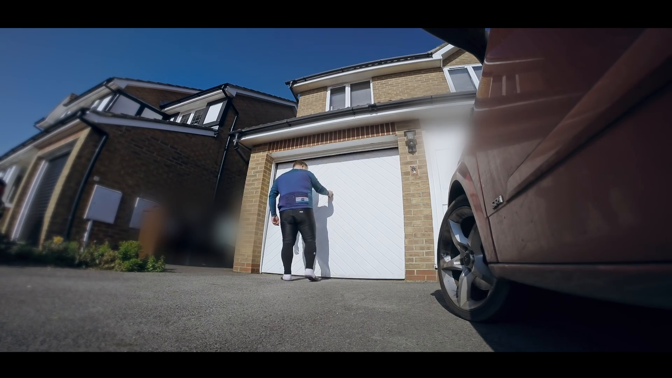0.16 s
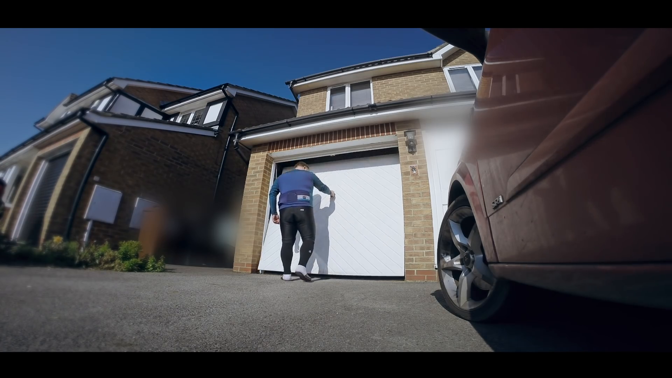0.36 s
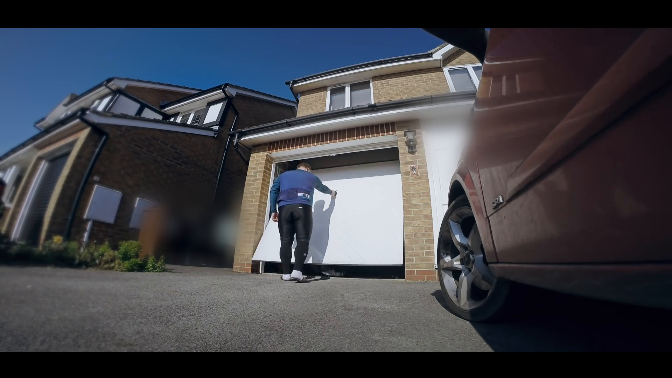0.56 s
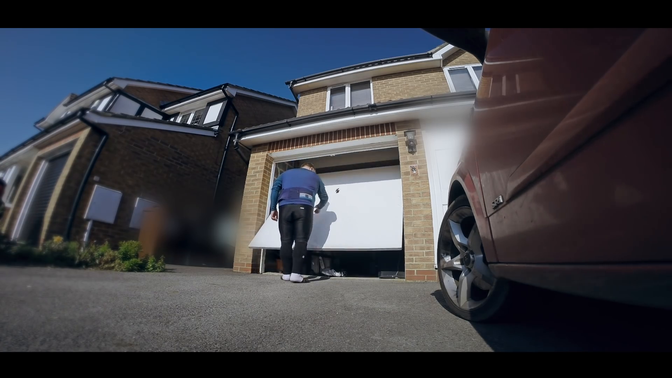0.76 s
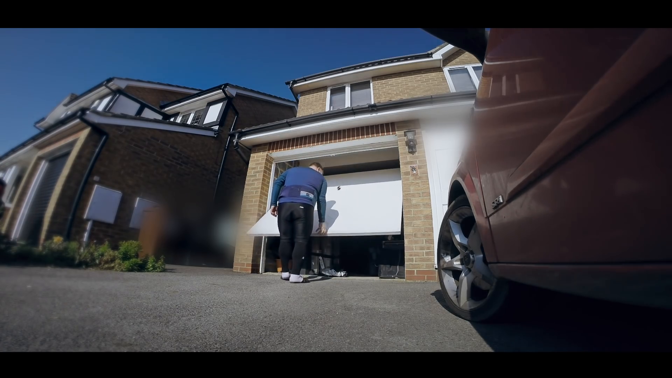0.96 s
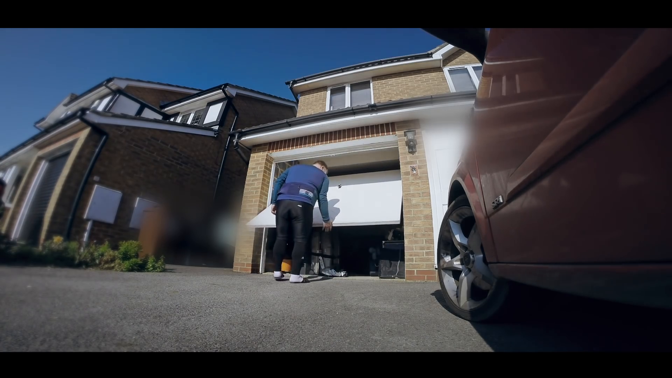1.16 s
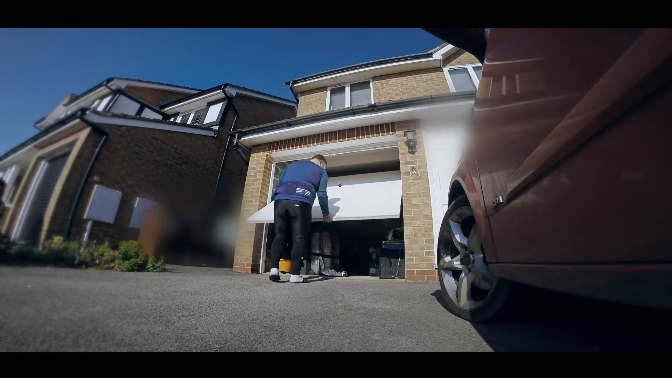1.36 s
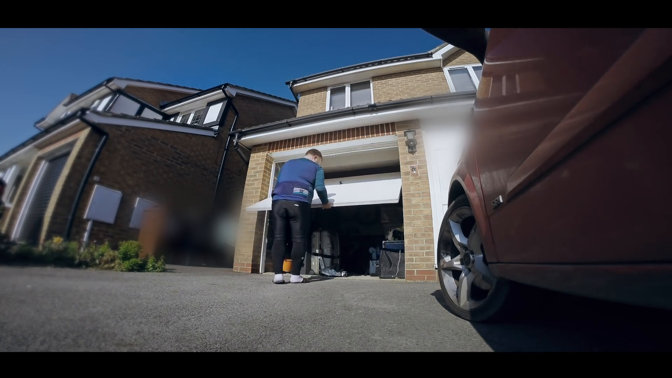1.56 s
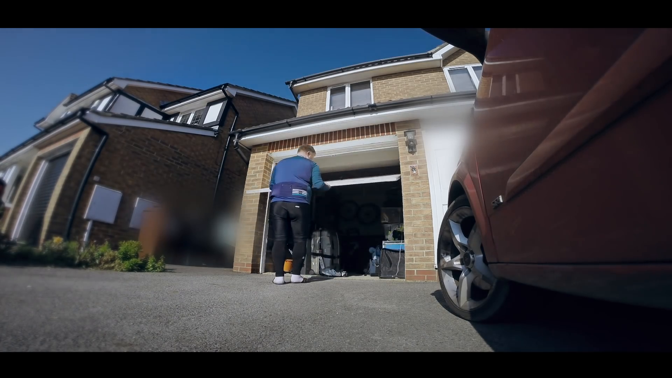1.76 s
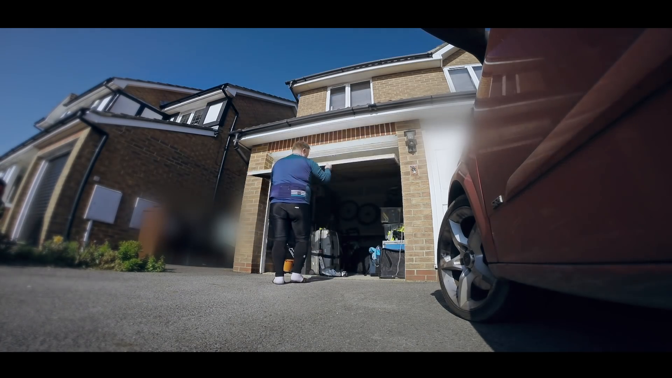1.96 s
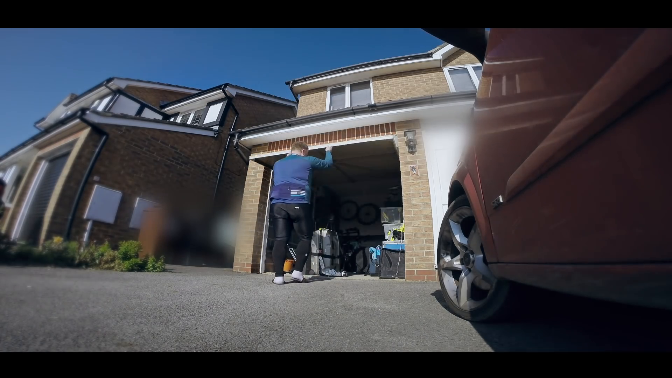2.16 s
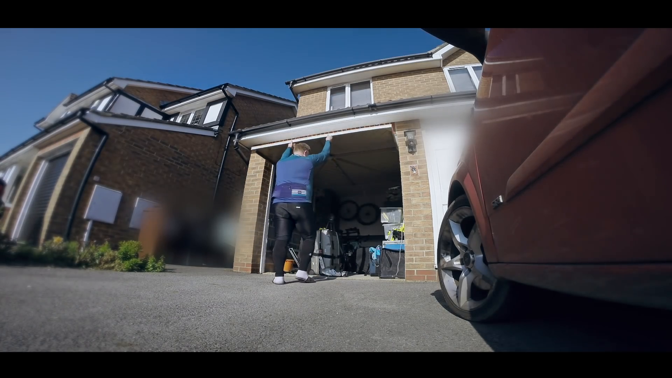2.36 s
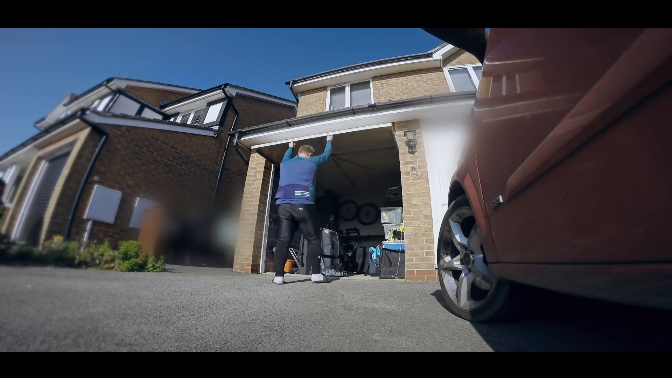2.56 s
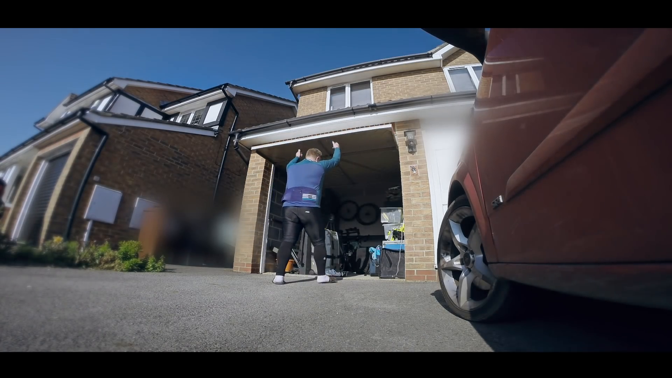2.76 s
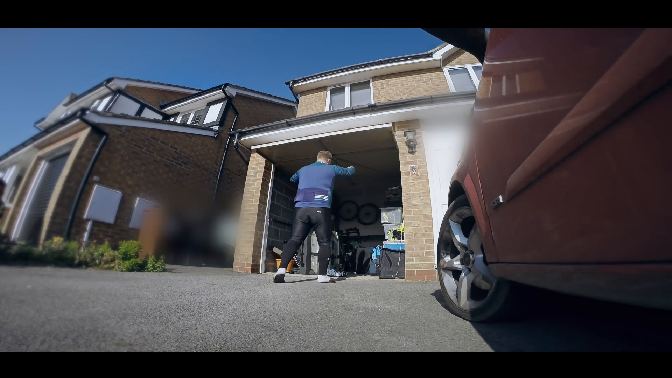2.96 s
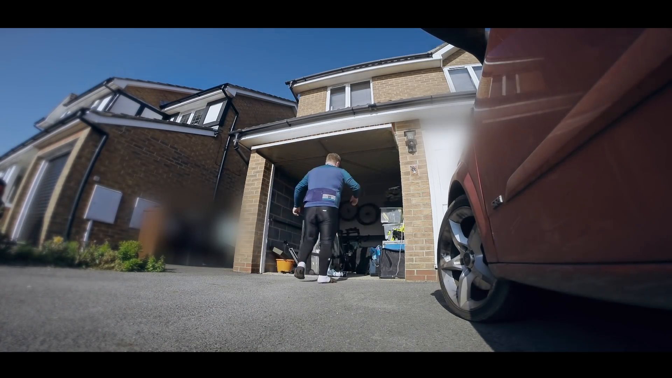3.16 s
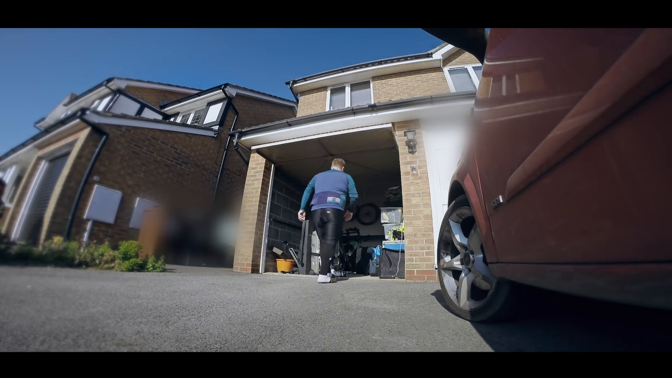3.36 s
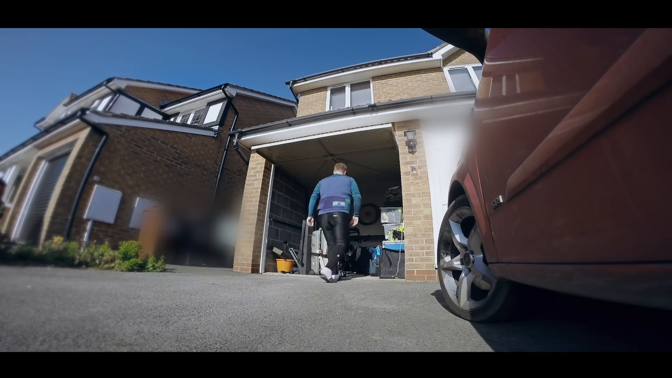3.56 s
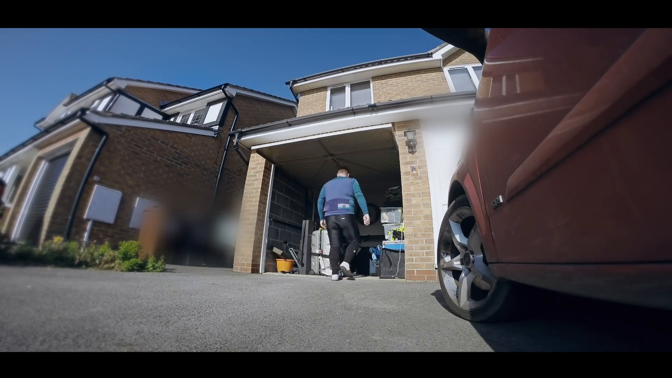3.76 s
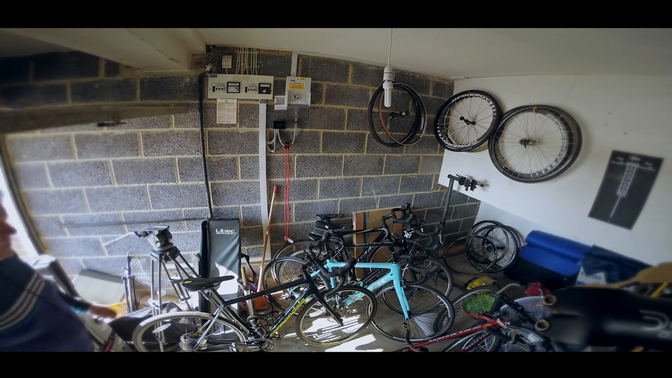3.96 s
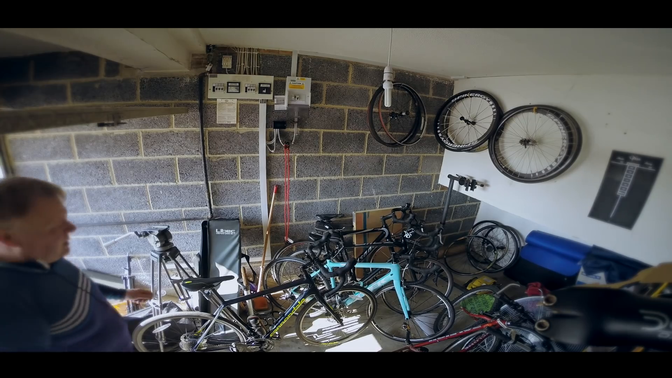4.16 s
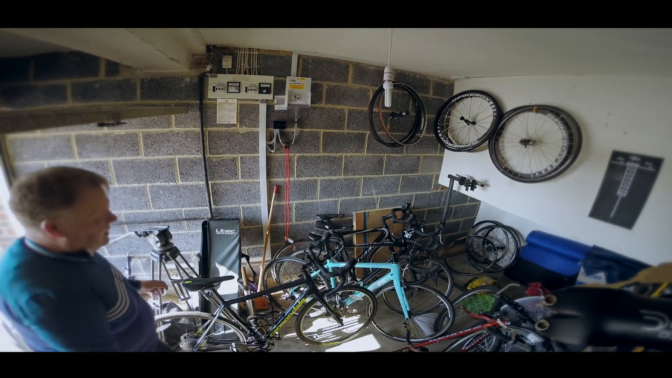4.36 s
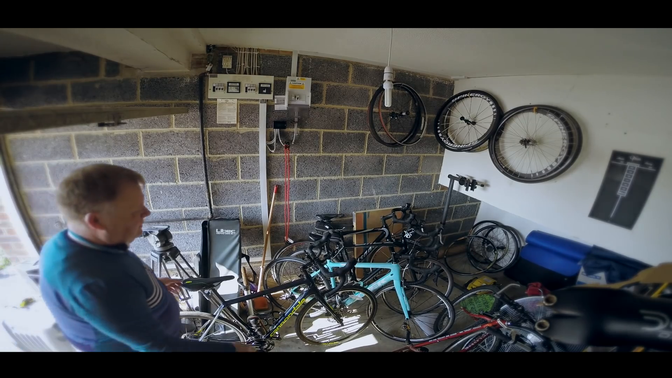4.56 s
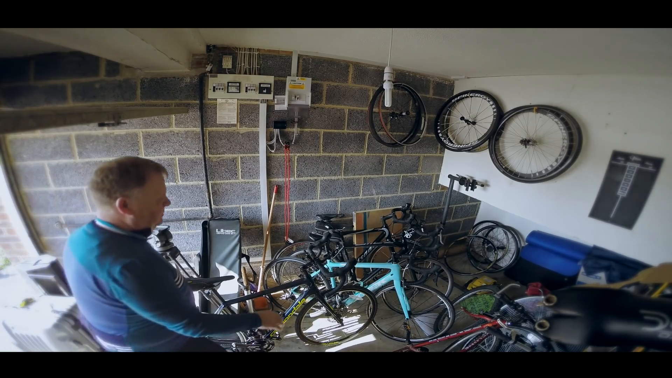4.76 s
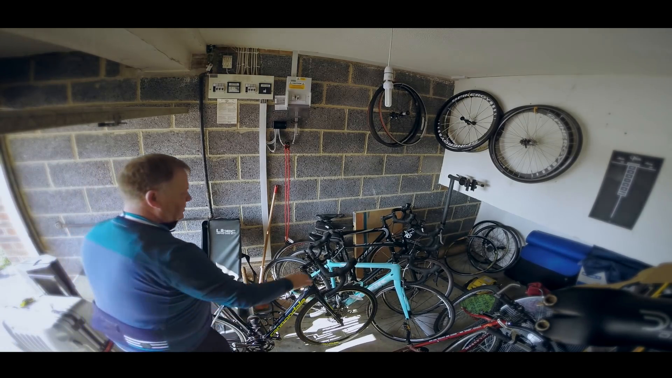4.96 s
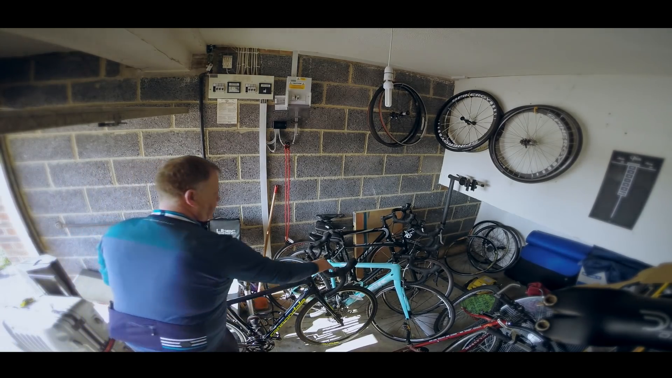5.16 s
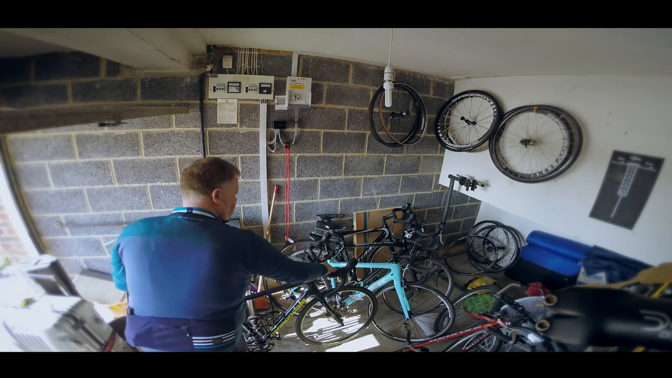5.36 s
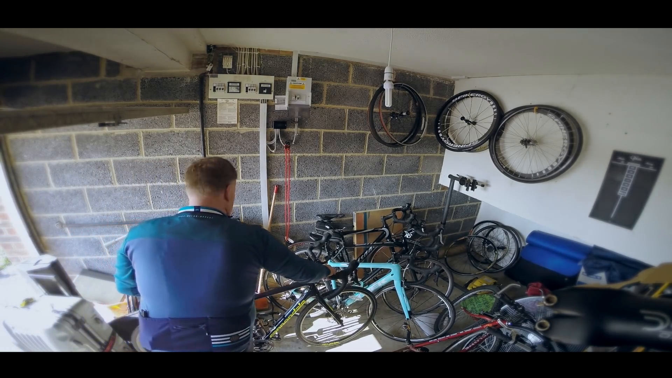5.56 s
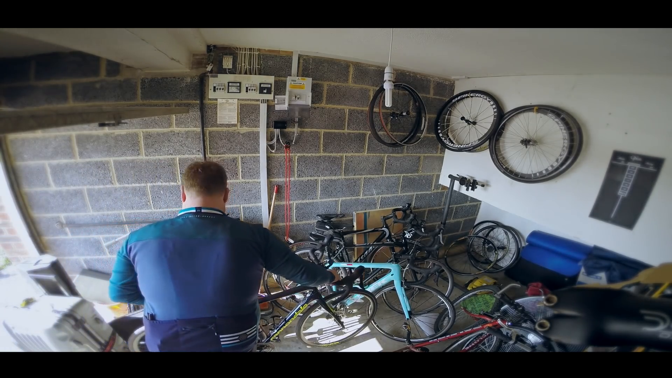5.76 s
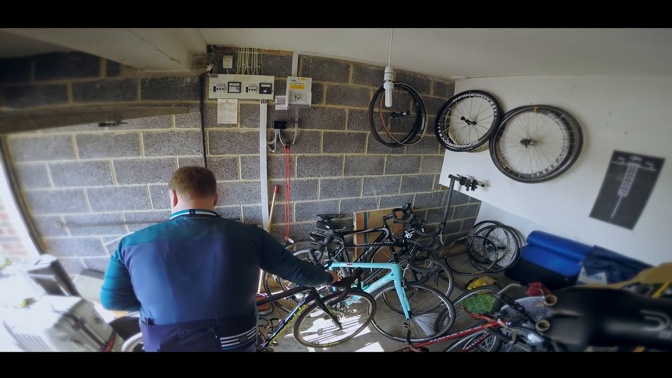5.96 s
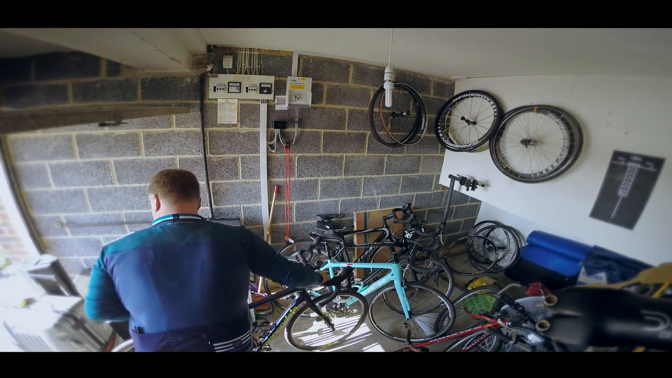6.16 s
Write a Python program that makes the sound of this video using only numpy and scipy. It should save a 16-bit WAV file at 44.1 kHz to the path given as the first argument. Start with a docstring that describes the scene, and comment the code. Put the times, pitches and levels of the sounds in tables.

```python
"""At a garage, a steel up-and-over door is hauled open in two main surges: struck and shaken modes boom and clank,
dense grains through metal spectra rattle like rollers in tracks. Gliding sines chirp as small birds over shaped-noise
rumble, and shoes tap across the drive as short noise bursts.
From 4 s the scene is heard inside the block-walled garage: shoes clack (modes), scuff and clatter (grit grains)."""
import sys
import numpy as np
from scipy import signal
from scipy.fft import rfft, irfft, next_fast_len
from scipy.io import wavfile
from scipy.ndimage import map_coordinates

SR = 44100
rng = np.random.default_rng(int(sys.argv[2]) if len(sys.argv) > 2 else 0)


def dump_mix(stems):
    """Bounce the given channels to the path in sys.argv[1] as a 16-bit WAV at rate SR."""
    frames = np.atleast_2d(stems).T  # one column per channel
    limited = np.clip(frames, -1, 1)  # hard clip at full scale
    pcm = np.round(limited * 32767).astype(np.int16)
    wavfile.write(sys.argv[1], SR, pcm)


N = 274257
TIME = np.arange(N) / SR  # s
INSIDE_S, TOP_HZ = 4.01, 15500
STREET_DB, INDOORS_DB = -50.5, -53.5  # before slow wander
ECHO_GAIN = 0.26  # each early echo against direct
SEAL_DB, SEAL_SHARE = -6, 0.11  # frame damps the sheet over the first share of the travel
CHATTER_DB = -4  # stray joint knocks against frame rattle
ARMS_DB, TICK_DB = -4, -7.5  # arms against frame blow; tick against track click
JOLT_DB, JOLT_OPEN_DB = -7.5, -12  # panel against frame blow when shut; change when fully open

# background spectra: f/Hz, relative level/dB
STREET_SPECTRUM = [(12, -46), (20, -5.5), (76, -3.5), (306, -17.5), (404, -21), (549, -24), (1300, -28),
                   (3260, -33), (3960, -35.5), (4680, -36), (15500, -55.5)]
INDOORS_SPECTRUM = [(12, -59), (20, -9), (53, -5), (245, -17.5), (282, -16.5), (649, -21), (767, -22),
                    (2470, -30), (2920, -32), (3540, -31.5), (3960, -32), (15500, -52)]
# pulls on the door (loosening tug, haul, change of grip, haul, nudge):
# start t/s, rise/s, let-go t/s, slowing/(dB/s), speed/dB
HAULS = [(-.01, 0.01, 0.27, 59, -12.5), (0.514, 0.18, 1.046, 49.5, 0), (1.55, 0.13, 1.73, 65, -14),
         (1.696, 0.085, 2.361, 50.5, 0), (2.66, 0.038, 2.7, 74, -41)]
# response of each part to motion: level/dB at full speed when shut, growth/(dB per dB of speed),
# change/dB from shut to fully open
BOOM_DRIVE = (-44, 0.19, -0.97)
DRUMMING_DRIVE = (-38, 0.58, -3)
SHEET_DRIVE = (-35, 0.86, -14.5)
RATTLE_DRIVE = (-47.5, 0.92, 5)
HISS_DRIVE = (-50.5, 1.01, 2.5)
SIZZLE_DRIVE = (-60.5, 2.5, 14)
# modes of steel panel, roller bearings, frame and lifting arms: f/Hz, width/Hz, relative level/dB
PANEL_MODES = [(48, 14, -8), (66.7, 9.3, 5.5), (108.6, 13, 0), (145, 11.8, 5), (155.7, 25.2, 1),
               (178.3, 18.7, 1), (207.4, 30, -4), (257.7, 27.4, -3.5), (294, 8.1, 0), (302.4, 13, -6),
               (344, 37, -5), (377, 43, -9), (436.5, 24.5, -8.5), (542, 27, -14.5)]
BEARING_MODES = [(5200, 970, -4.5), (5550, 500, 4), (5940, 450, 2), (6230, 490, 0.5), (15100, 5100, -26)]
ARM_MODES = [(659.4, 34, 1.5), (748, 150, 4), (890, 38, 1), (927, 21, -4), (1118, 120, -14),
             (1315, 62, -1.5), (1417, 9.5, -12), (1710, 43, -4.5), (1883, 110, -12), (2017, 290, -2.5),
             (2140, 21, -11.5)]
# sheet flexing as it tips: peak t/s, half-length/s, f/Hz, level/dB
FLEXES = [(0.216, 0.15, 46.3, -38.5), (0.294, 0.035, 119.7, -41), (0.387, 0.03, 66.1, -41),
          (0.59, 0.018, 151.2, -32), (0.703, 0.066, 53, -31), (.78, 0.18, 27.45, -38),
          (0.796, 0.058, 67, -35), (0.807, 0.037, 133.9, -34.5), (0.984, 0.061, 288.2, -33.5),
          (1.786, 0.048, 142.2, -38.5), (1.974, .047, 111.8, -42), (2.136, 0.0097, 290, -38),
          (2.17, 0.19, 51.8, -44), (2.223, 0.025, 110, -29.5), (2.336, 0.14, 77.93, -37.5),
          (2.667, 0.039, 65.3, -36.5)]
# spectra of frame, track, rollers, steel-on-steel contact: f/Hz, relative level/dB
FRAME_SPECTRUM = [(250, -70), (520, -8), (760, 0.5), (970, 0), (1400, -6.5), (2000, -14.5), (2600, -32),
                  (4500, -109)]
TRACK_SPECTRUM = [(1200, -30), (2500, 1), (3600, 3.5), (4800, -0.5), (6000, 3), (7200, -6.5), (10000, -12),
                  (13000, -29), (15500, -18)]
ROLLER_SPECTRUM = [(1200, 2), (2500, 2.5), (3600, 1.5), (4900, -1), (6100, -15), (6900, -10), (9000, -16),
                   (13000, -31), (15500, -48)]
CONTACT_SPECTRUM = [(350, -2.5), (1000, 3.5), (1800, -5.5), (3500, -9.5), (6000, -42)]
# roller skidding in its track: peak t/s, half-length/s, level/dB before load sway
SKIDS = [(1.161, 0.0086, -52), (2.052, 0.015, -38), (2.295, 0.0086, -50), (2.46, 0.027, -46.5),
         (2.561, 0.015, -55)]
# slack joint clicks on the track, then strikes the frame: t/s, slack/s, track level/dB, frame level/dB
CLANKS = [(0.034, 0.0023, -53, -57), (.168, 0.00032, -58.5, -51), (.188, 0, -66, -51),
          (0.532, 0.00031, -56.5, -50.5), (.588, .015, -62, -46.5), (0.7, 0.0011, -54, -36),
          (.711, 0, -56, -38.5), (.753, 0, -42.5, -39.5), (0.772, 0.00076, -46, -34.5),
          (0.827, 0.002, -50, -44.5), (.901, 0.002, -47, -33.5), (.912, 0.0031, -51, -35.5),
          (.954, 0.0052, -50, -38), (0.969, 0, -50.5, -45.5), (1.036, 0, -44, -47.5),
          (1.082, 0.0013, -52, -56), (1.145, 0.0089, -42, -41.5), (1.202, 0, -55, -42.5),
          (1.349, 0.0046, -50, -51), (1.714, 0.023, -45, -39.5), (1.88, 0.01, -42, -55),
          (1.9453, 0.0035, -45, -45.5), (2.023, 0.014, -45, -41), (2.222, 0, -49, -57),
          (2.261, 0.0049, -49.5, -62), (2.374, 0, -62, -62), (2.39, 0.0037, -45, -45),
          (2.421, 0.0035, -49, -37.5), (2.445, 0.00082, -50, -37.5), (2.604, 0.00026, -79, -48.5),
          (2.66, 0.0055, -60.5, -53.5)]
# decay of struck steel: f/Hz, T60/s
STEEL_T60 = [(100, 1), (300, 0.18), (1000, 0.14), (3000, 0.19), (6000, 0.17), (14000, 0.14)]
# small loose metal parts, on the door then in the garage: t/s, f/Hz, level/dB before a 7 dB cut, T60/s
CLINKS = [(.034, 11500, -56, 0.044), (.153, 4120, -53.5, 0.038), (.189, 1880, -45.5, .035),
          (.260, 2940, -47.5, 0.04), (.295, 3000, -49.5, 0.02), (0.702, 2100, -36.5, 0.066),
          (0.712, 1030, -31.5, .11), (.722, 2330, -38, 0.094), (0.904, 3230, -43, 0.14),
          (1.147, 3210, -39, 0.11), (1.353, 3080, -40.5, 0.048), (1.945, 3930, -38, 0.029),
          (2.39, 3900, -40, 0.15), (2.806, 3870, -59, 0.056), (2.853, 3840, -57, 0.034),
          (4.049, 6400, -46, 0.11), (5.365, 3430, -53.5, 0.15), (5.745, 5400, -50, 0.11),
          (5.762, 4360, -51.5, 0.12), (5.8, 4900, -53, .1)]
# small birds: t/s, length/s, start f/Hz, end f/Hz, level/dB before flutter and echo
CHIRPS = [(0.349, 0.13, 7960, 7600, -72), (0.438, 0.081, 7300, 7600, -74), (2.866, 0.017, 5430, 6200, -66),
          (2.888, 0.02, 5200, 6030, -58.5), (3.833, 0.045, 3150, 4240, -53.5),
          (3.939, 0.032, 5200, 5900, -58), (3.941, 0.044, 4000, 4500, -60), (4.464, 0.017, 3070, 2900, -55),
          (4.704, .02, 3140, 2870, -58), (4.902, .022, 2960, 3030, -61), (5.588, 0.019, 3110, 2850, -51.5),
          (6.013, 0.024, 3040, 2890, -55.5)]
# shoes on the drive: t/s, tap level/dB, grit level/dB
DRIVE_STEPS = [(2.948, -63.5, -62.5), (3.085, -61, -68), (3.508, -54.5, -61), (3.523, -49, -64),
               (3.595, -49, -63), (3.762, -61, -57)]
# crushed grit: f/Hz, relative level/dB
GRIT_SPECTRUM = [(1500, 0), (3200, -0.5), (5500, -1.5), (7500, -9), (10000, -16), (15500, -24)]
# soles scuffing or clattering: peak t/s, rise/s, fall/s, level/dB, centre f/Hz, width/octaves,
# clack-mode ring/dB
SCUFFS = [(4.013, 0.0053, 0.24, -50.5, 3100, 1.3, -8), (4.096, 0.058, 0.03, -45.5, 600, 0.7, -8),
          (4.136, 0.014, 0.025, -29.5, 2430, 0.53, 2), (4.2, 0.034, 0.02, -44.5, 1840, 1.4, -1),
          (4.395, 0.027, 0.013, -51, 1600, 1.5, 5), (4.619, 0.017, 0.023, -35.5, 3470, 0.92, -9),
          (5.082, 0.02, 0.037, -38.5, 1450, 0.92, -7), (5.40, 0.1, 0.045, -57, 2180, 1.2, -12),
          (5.494, 0.045, 0.028, -44, 2690, 1.15, 0), (5.71, 0.053, 0.029, -48, 1450, 1.44, 1),
          (5.78, 0.031, 0.042, -53.5, 3920, 0.51, 3), (6.143, 0.011, 0.061, -52, 2200, 1.5, 6)]
# steps indoors: heel t/s, heel to sole/s, clack level/dB, thud level/dB, knock level/dB, grit level/dB,
# sole against heel/dB, clack cut-off f/Hz
GARAGE_STEPS = [(4.111, 0.022, -35.5, -57, -50.5, -43, 2, 4200),
                (4.351, 0.037, -59, -78, -77, -53, -14, 4420),
                (4.5717, 0.019, -41.5, -65, -50, -45.5, 1.5, 1680),
                (5.045, .037, -43.5, -48, -48, -49, -2.5, 2900),
                (5.7458, .02, -49.5, -51.5, -49, -51, -16, 1900),
                (6.1139, .011, -47, -53.5, -43, -56, 4, 1670)]
# low thud of a landing: f/Hz, relative level/dB
THUD_SPECTRUM = [(40, -6), (65, 1), (125, 6), (170, -11), (260, -46)]
# hollow knock and shoe clack: f/Hz, width/Hz, relative level/dB
KNOCK_MODES = [(220, 32, -9.5), (309, 57, -3), (400, 78, 0), (438, 12, 7.5), (588, 87, 1.5), (674, 39, 5.5),
               (783, 91, -4)]
CLACK_MODES = [(1115.4, 92, 4), (1270, 52, 3), (1392, 110, 3), (1567, 100, 7), (1683, 120, 0.5),
               (1820, 61, 2), (1967, 49, 1), (2120, 40, 3), (2310, 14, 0), (2380, 40, 5), (2595, 45, 1.5),
               (2760, 11, 3.5), (3010, 33, 2), (3160, 130, -2), (3710, 22, -3)]
# decay in the garage: f/Hz, T60/s
GARAGE_T60 = [(100, 0.35), (500, 0.22), (2000, 0.41), (6000, 0.18), (14000, 0.31)]


def amp(db):
    """Decibels to gain."""
    return 10 ** (np.asarray(db) / 20)


def unit(x):
    """x at rms 1."""
    return x / np.sqrt(np.mean(x ** 2) + 1e-20)


def along(points, hz):
    """(Hz, value) points read on a log axis."""
    f, v = np.transpose(points)
    return np.interp(np.log(hz + 1), np.log(f + 1), v)


def wobble(rate_hz):
    """Smooth random curve, rate_hz knots a second."""
    knots = rng.standard_normal(int(N * rate_hz / SR) + 4)
    return map_coordinates(knots, [TIME * rate_hz])


def swell(peak_s, half_s):
    """Bell-shaped rise and fall around peak_s."""
    return np.exp(-.5 * ((TIME - peak_s) / half_s) ** 2)


def filtered(x, response):
    """x times a response of frequency."""
    m = next_fast_len(len(x) + SR // 2)
    return irfft(rfft(x, m) * response(np.fft.rfftfreq(m, 1 / SR)), m)[:len(x)]


def colour(points):
    """Response of a (Hz, dB) spectrum."""
    return lambda hz: amp(along(points, hz))


def resonances(modes):
    """Causal response of (Hz, width Hz, dB) modes, alternating in sign."""
    def response(f):
        total = 0
        for k, (centre, width, db) in enumerate(modes):
            damping = 1j * f * width
            total = total + (-1) ** k * amp(db) * damping / (centre ** 2 - f * f + damping)
        return total
    return response


def grains(rate_hz, spread_db):
    """Tiny impacts at random moments, sizes log-normal with clipped tails."""
    sizes = amp(spread_db * np.clip(rng.standard_normal(N), -2, 2)) * rng.choice([-1, 1], N)
    return sizes * (rng.random(N) < rate_hz / SR)


def crackle(response, rate_hz, spread_db, life_s):
    """Noise grains, each decaying to 1/e in life_s, heard through a body; rms 1."""
    power = signal.lfilter([1], [1, -np.exp(-2 / (life_s * SR))], grains(rate_hz, spread_db) ** 2)
    return unit(filtered(np.sqrt(np.abs(power)) * rng.standard_normal(N), response))


def dying(t60):
    """Dense ringing in which each frequency dies at its own speed."""
    hz, t, z = signal.stft(rng.standard_normal(SR // 2), SR, nperseg=256)
    decay = amp(-60 * t / np.maximum(along(t60, hz), .01)[:, None])
    return signal.istft(z * decay, SR, nperseg=256)[1]


def blow(response, t60, attack_s):
    """One blow on a densely ringing body; first 20 ms at unit standard deviation."""
    ring = filtered(dying(t60), response)
    ring = ring * (1 - np.exp(-np.arange(len(ring)) / SR / attack_s))
    return ring / np.std(ring[:SR // 50])


def chime(modes, t60_s, attack_s):
    """Distinct unsteady modes, strengths redrawn per blow; first 20 ms at unit standard deviation."""
    t = np.arange(SR // 3) / SR
    hz, width, db = np.transpose(modes)[:, :, None]
    drift = np.cumsum(rng.standard_normal((len(modes), len(t))), axis=1) * np.sqrt(1.2 * width / SR)
    phase = 2 * np.pi * (hz * t + rng.random(hz.shape)) + drift
    ring = np.sum(amp(db + rng.normal(0, 0.19, hz.shape)) * np.sin(phase), axis=0)
    ring = ring * amp(-60 * t / t60_s) * (1 - np.exp(-t / attack_s))
    return ring / np.std(ring[:SR // 50])


def add(track, s, sound):
    """Mix a sound into the track from s on."""
    part = track[max(round(s * SR), 0):][:len(sound)]
    part += sound[:len(part)]


def walls(x):
    """Close surfaces add early echoes, which comb the sound into bands."""
    taps = np.zeros(SR // 50)
    taps[rng.integers(SR // 400, len(taps), size=8)] = ECHO_GAIN * rng.choice([-1, 1], size=8)
    taps[0] = 1
    return signal.fftconvolve(x, taps / np.linalg.norm(taps))[:N]


def motion():
    """Each pull speeds the door up, holds, then lets it coast: speed in dB and opening 0-1."""
    speed = 1e-6
    for s, rise_s, let_go_s, slowing, db in HAULS:
        coast_db = slowing * np.maximum(TIME - let_go_s, 0)
        speed = speed + np.clip((TIME - s) / rise_s, 0, 1) * amp(db - coast_db)
    return 20 * np.log10(speed), np.cumsum(speed) / np.sum(speed)


def driven(part, move):
    """Part gain follows door speed and shifts ever faster as the door tips flat."""
    full_db, growth, open_db = part
    speed_db, opening = move
    return amp(full_db + growth * speed_db + open_db * opening ** 2)


def background():
    """Distant traffic and breeze as shaped noise, with less rumble once inside."""
    inside = np.clip((TIME - INSIDE_S) / 0.0032, 0, 1)
    street = unit(filtered(rng.standard_normal(N), colour(STREET_SPECTRUM)))
    room = unit(filtered(rng.standard_normal(N), colour(INDOORS_SPECTRUM)))
    street = amp(STREET_DB + 0.75 * wobble(1.73)) * street
    room = amp(INDOORS_DB + 2.1 * wobble(7)) * room
    return (1 - inside) * street + inside * room


def door_panel(move):
    """The swing shakes the sheet's modes; high ones ring most clear of the frame, calming as it lies flat."""
    def shake(modes):
        return unit(filtered(grains(rate_hz=830, spread_db=0), resonances(modes)))

    seal = amp(SEAL_DB * np.clip(1 - move[1] / SEAL_SHARE, 0, 1))
    boom = driven(BOOM_DRIVE, move) * shake(PANEL_MODES[:2])
    drumming = driven(DRUMMING_DRIVE, move) * shake(PANEL_MODES[2:7])
    sheet = seal * driven(SHEET_DRIVE, move) * shake(PANEL_MODES[7:])
    return boom + drumming + sheet


def door_rollers(move):
    """Rollers run over rough track: frame rattles, joints chatter, bearings sizzle near 6 kHz."""
    load_db = 1.1 * wobble(27.5)  # rollers grip and ease as the door sways
    skids = sum(amp(db) * swell(s, half_s) for s, half_s, db in SKIDS)
    rattle = crackle(colour(FRAME_SPECTRUM), rate_hz=410, spread_db=-0.5, life_s=0.029)
    chatter = crackle(colour(CONTACT_SPECTRUM), rate_hz=60, spread_db=4.5, life_s=0.0083)
    hiss = crackle(colour(ROLLER_SPECTRUM), rate_hz=540, spread_db=0.0, life_s=0.014)
    sizzle = crackle(resonances(BEARING_MODES), rate_hz=280, spread_db=6.5, life_s=0.0064)
    rattle = driven(RATTLE_DRIVE, move) * (rattle + amp(CHATTER_DB) * chatter)
    hiss = driven(HISS_DRIVE, move) * hiss
    sizzle = (driven(SIZZLE_DRIVE, move) + skids) * amp(load_db) * sizzle
    return walls(rattle + hiss + sizzle)


def door_flex():
    """Each flex of the sheet swells and fades on one low, wavering note."""
    out = np.zeros(N)
    for s, half_s, hz, db in FLEXES:
        phase = 2 * np.pi * hz * TIME + 0.85 * wobble(25.23)
        out += amp(db) * swell(s, half_s) * np.sin(phase)
    return out


def door_clanks(move):
    """Slack joints strike: track clicks, then after any slack frame, arms and panel ring."""
    out = np.zeros(N)
    tick_spectrum = colour([(2000, -1), (5000, 5), (15000, -21)])
    for s, slack_s, track_db, frame_db in CLANKS:
        click = blow(colour(TRACK_SPECTRUM), STEEL_T60, attack_s=0.00044)
        tick = blow(tick_spectrum, [(5000, 0.022)], attack_s=.0001)
        contact = blow(colour(CONTACT_SPECTRUM), [(500, 0.38), (3000, 0.072)], attack_s=0.00012)
        arms = amp(ARMS_DB) * chime(ARM_MODES, t60_s=0.15, attack_s=0.00018)
        jolt_db = JOLT_DB + JOLT_OPEN_DB * np.interp(s, TIME, move[1]) ** 2
        panel = amp(jolt_db) * blow(resonances(PANEL_MODES[3:]), STEEL_T60, attack_s=0.0018)
        add(out, s, amp(track_db) * (click + amp(TICK_DB) * tick))
        for ring in (contact, arms, panel):
            add(out, s + slack_s, amp(frame_db) * ring)
    return out


def clinks():
    """A small steel part ticks and rings on close partials; the longer it rings, the purer they are."""
    out = np.zeros(N)
    for s, hz, db, t60_s in CLINKS:
        width = np.clip(0.47 / t60_s ** 2, 10, 600)
        partials = resonances([(.82 * hz, width, -7), (hz, width, 0), (1.5 * hz, width, -6)])
        tick_band = lambda f: f * hz / (f * f + hz * hz) / np.sqrt(1 + (f / hz) ** 2)
        tick = blow(tick_band, [(hz, .03)], attack_s=.0002)
        ring = blow(partials, [(hz, t60_s)], attack_s=0.00018)
        add(out, s, amp(db - 7) * (ring + amp(-6) * tick))
    return out


def birds():
    """Thin whistles glide quickly, then level off; the house fronts blur them."""
    out = np.zeros(N)
    waver = 0.0057 * wobble(250)
    for s, length_s, start_hz, end_hz, db in CHIRPS:
        u = np.linspace(0, 1, int(length_s * SR))
        hz = start_hz + (end_hz - start_hz) * np.sin(u * np.pi / 2)
        hz = hz * (1 + waver[round(s * SR):][:len(u)])
        envelope = np.sqrt(np.abs(np.sin(np.pi * u)))
        add(out, s, amp(db) * envelope * np.sin(2 * np.pi * np.cumsum(hz) / SR))
    out = out * amp(3.2 * wobble(140))  # flutter
    echo = dying([(3000, 0.062), (8000, 0.13)])
    reflected = signal.fftconvolve(out, echo / np.linalg.norm(echo))[:N]
    outdoors = TIME < INSIDE_S  # indoors only the reflections arrive
    return out * outdoors + np.where(outdoors, amp(-14), 1) * reflected


def drive_steps():
    """Shoes tap and crunch on the tarmac as short noise blows, dry in the open air."""
    out = np.zeros(N)
    sole = resonances([(816, 700, -7.5), (1170, 540, -5.5), (2350, 440, -15.5)])
    open_air_t60 = [(800, 0.2), (6000, 0.023)]
    for s, tap_db, grit_db in DRIVE_STEPS:
        add(out, s, amp(tap_db) * blow(sole, open_air_t60, attack_s=0.00028))
        add(out, s, amp(grit_db) * blow(colour(GRIT_SPECTRUM), open_air_t60, attack_s=0.00047))
    return out


def garage_scuffs():
    """A sole scuffs or clatters on gritty concrete and excites the clack modes; walls echo the grit."""
    grit_sum, excitation = np.zeros((2, N))
    for s, rise_s, fall_s, db, centre_hz, octaves, ring_db in SCUFFS:
        def band(hz):
            bell = np.exp(-.5 * (np.log2((hz + 1) / centre_hz) / octaves) ** 2)
            return bell / np.sqrt(1 + (hz / 7000) ** 2)

        envelope = np.exp(-np.maximum((s - TIME) / rise_s, (TIME - s) / fall_s))
        grit = amp(db) * envelope * crackle(band, rate_hz=1400, spread_db=8.5, life_s=0.0026)
        grit_sum += grit
        excitation += amp(ring_db) * grit
    return walls(grit_sum + filtered(excitation, resonances(CLACK_MODES)))


def garage_steps():
    """Heel and sole each thud, knock, clack and crush grit; a soft landing dulls the clack."""
    out = np.zeros(N)
    for heel_s, roll_s, clack_db, thud_db, knock_db, grit_db, sole_db, cut_hz in GARAGE_STEPS:
        modes = [(hz, width, db - 10 * np.log10(1 + (hz / cut_hz) ** 6)) for hz, width, db in CLACK_MODES]
        for s, weight in [(heel_s, 1), (heel_s + roll_s, amp(sole_db))]:
            thud = amp(thud_db) * blow(colour(THUD_SPECTRUM), [(60, 0.21), (200, 0.21)], attack_s=0.0098)
            knock = amp(knock_db) * blow(resonances(KNOCK_MODES), GARAGE_T60, attack_s=0.003)
            grit = amp(grit_db) * blow(colour(GRIT_SPECTRUM), GARAGE_T60, attack_s=0.0045)
            clack = amp(clack_db) * chime(modes, t60_s=0.21, attack_s=0.00087)
            add(out, s, weight * (thud + knock + grit))
            add(out, s, weight * clack)
    return out


def scene():
    """Background, door, clinks, birds and footsteps in one channel."""
    move = motion()
    door = door_panel(move) + door_rollers(move) + door_flex() + door_clanks(move)
    feet = drive_steps() + garage_scuffs() + garage_steps()
    return (background() + door + clinks() + birds() + feet)[None]


def record(dry):
    """Band limit: nothing from TOP_HZ up is kept."""
    return filtered(dry[0], lambda hz: hz < TOP_HZ)[None]


dry = scene()
out = record(dry)
dump_mix(out)
```